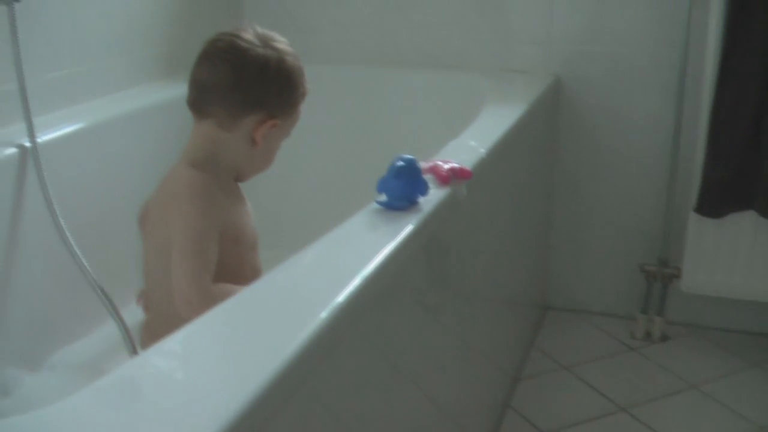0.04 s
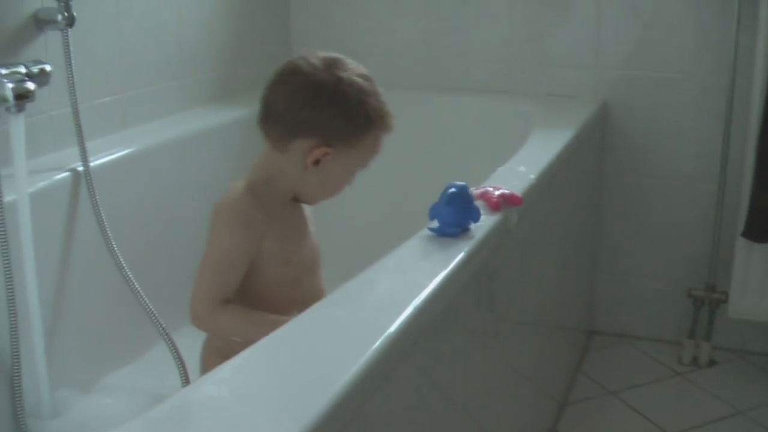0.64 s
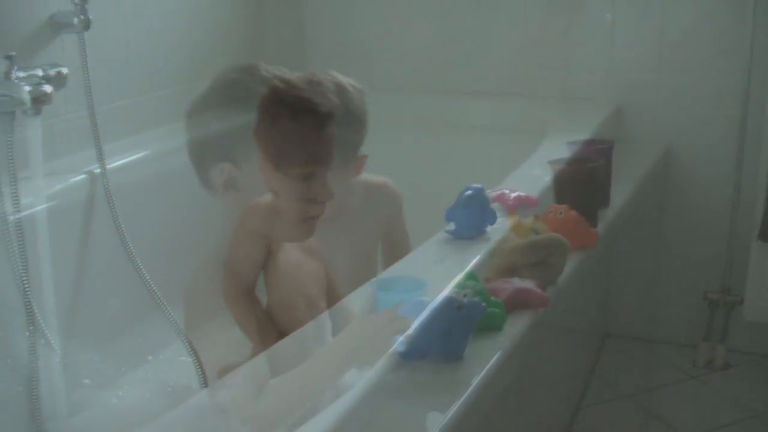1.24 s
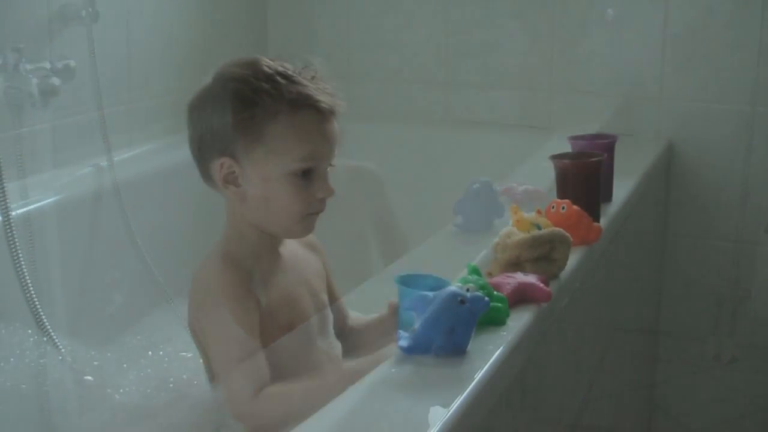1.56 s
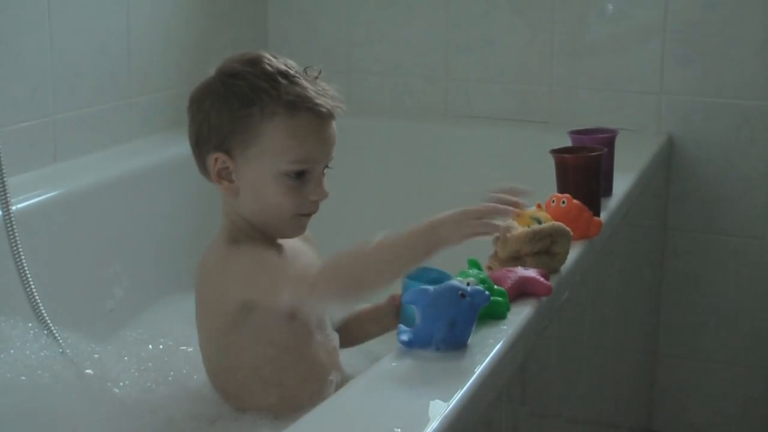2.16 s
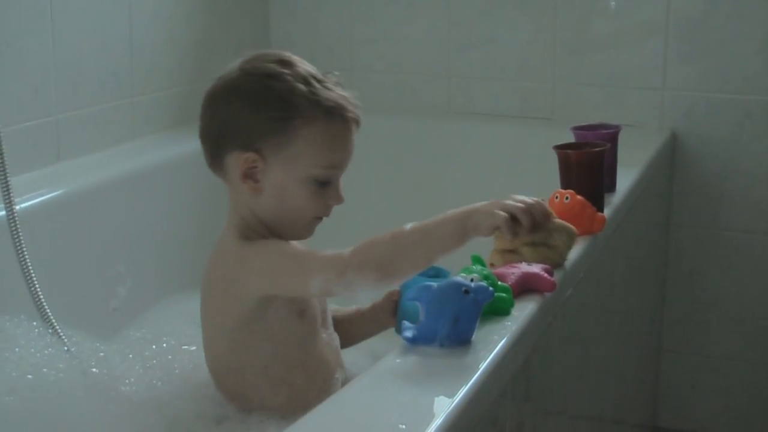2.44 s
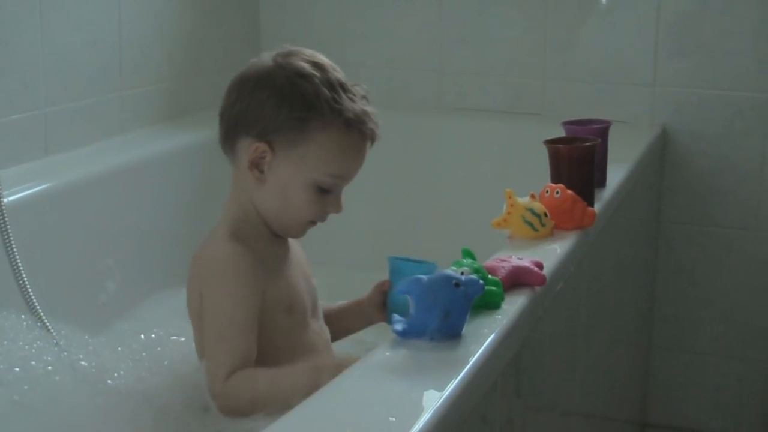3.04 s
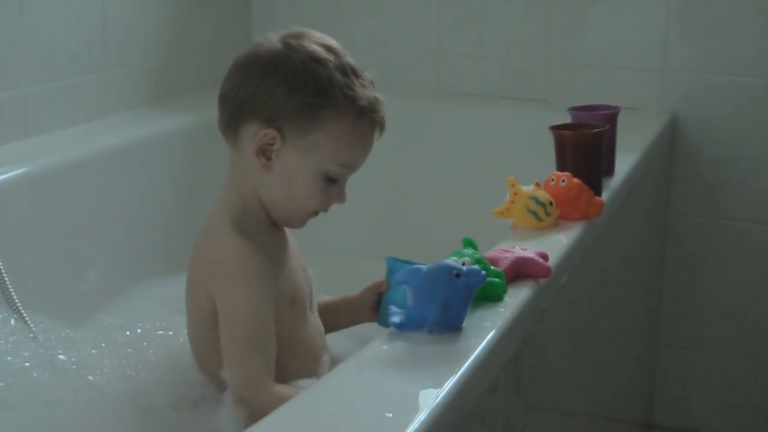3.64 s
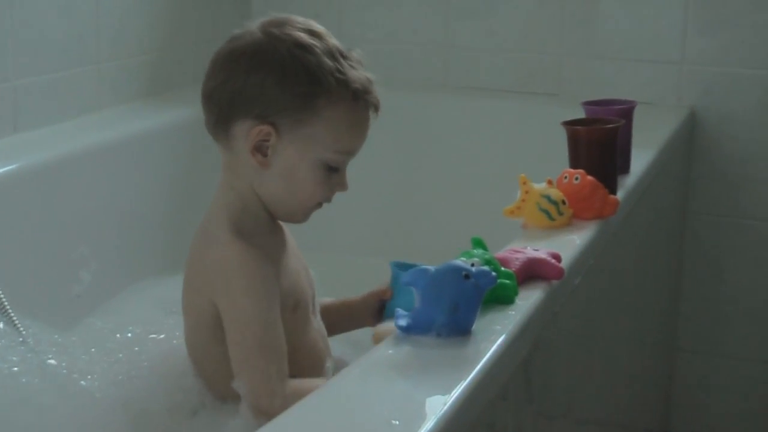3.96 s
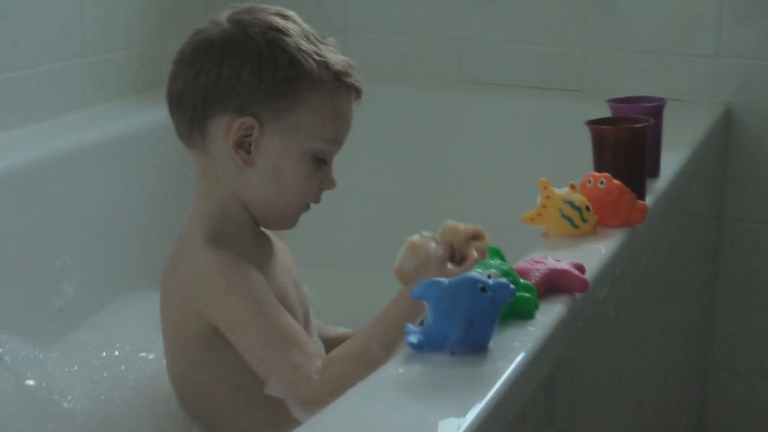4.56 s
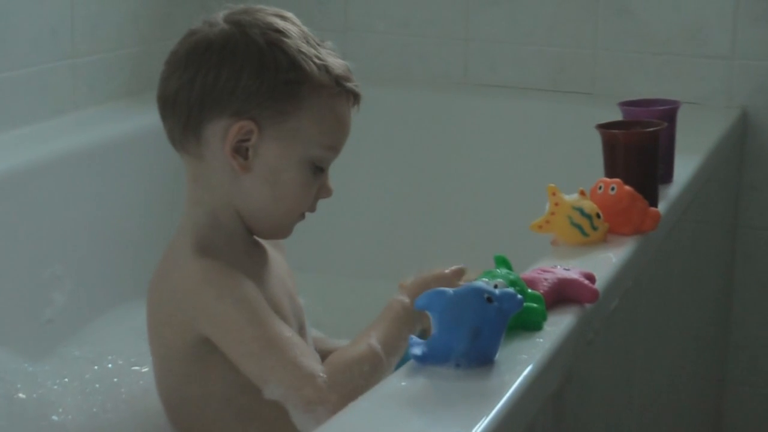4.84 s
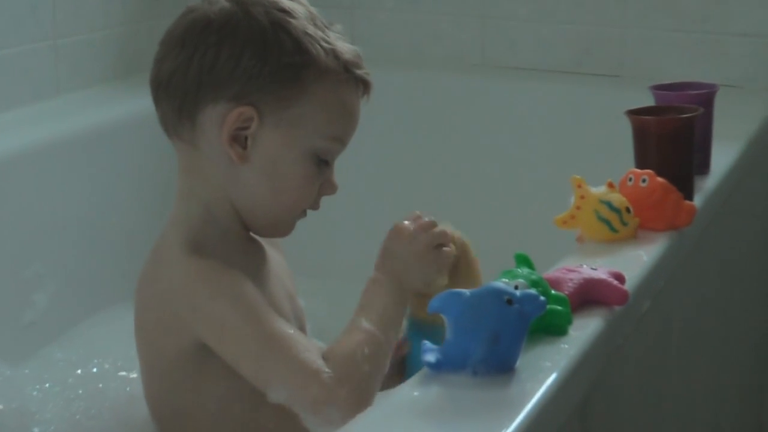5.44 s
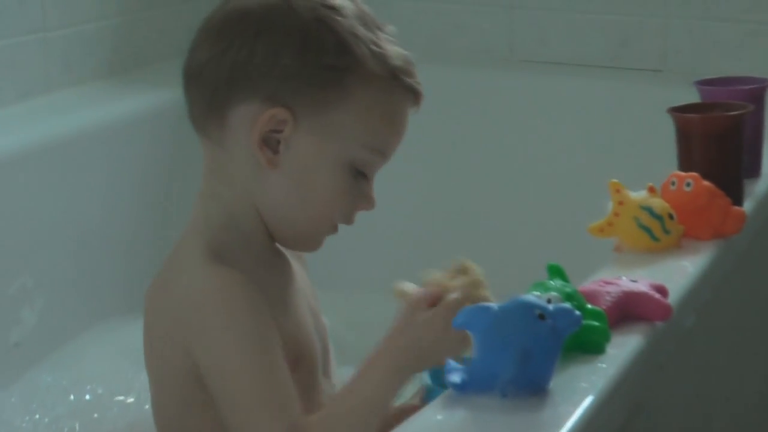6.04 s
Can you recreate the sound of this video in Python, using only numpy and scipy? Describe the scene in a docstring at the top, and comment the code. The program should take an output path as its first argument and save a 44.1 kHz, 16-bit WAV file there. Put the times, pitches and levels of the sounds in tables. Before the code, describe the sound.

Heard from beside the tub in a small, echoing bathroom, a jet of water churns into the bath, then shuts off. In the quiet, plastic toys click twice and the water swishes softly. Suds fizz faintly as a hand moves through the bath and squeezes out a sponge, giving a brief run of splashes and plopping drops that trails off into low room tone.

```python
"""Tiled bathroom, one microphone beside the tub. A tap gushes into the filled bath, its jet churning
up bubbles and spray, and dies away by 2 s. Two very short, dry clicks break the hush at 2.8 and 3.5 s,
and water begins to swish. From 3.6 s foam fizzes; then a hand stirs the bath and wrings a wet sponge
over a plastic cup: water sloshes, plops and spatters, and the tiles answer. The last drips fall
near 6 s, over quiet room tone."""
import sys
import numpy as np
from scipy import signal
from scipy.fft import rfft, irfft, next_fast_len
from scipy.io import wavfile
from scipy.ndimage import uniform_filter1d, map_coordinates

SR = 44100
rng = np.random.default_rng(int(sys.argv[2]) if len(sys.argv) > 2 else 0)


def int16_out(signal):
    """Quantize to a 16-bit WAV file."""
    q = np.round(np.clip(np.atleast_2d(signal).T, -1, 1) * 32767)
    wavfile.write(sys.argv[1], SR, q.astype(np.int16))


N = 277389
TIME = np.arange(N) / SR

# Under the jet, the large bubbles and the smaller ones: f/Hz, level/dB
GULP_SPECTRUM = [(30, -60), (70, -96), (120, -39.5), (180, -26), (250, -13.5), (330, -12), (400, -2),
                 (520, -1), (720, -3.5), (900, -15), (1400, -41), (4000, -73)]
GURGLE_SPECTRUM = [(150, -78), (550, -21), (850, -2.5), (1350, 5.5), (2000, 5), (3000, 3), (4000, -12.5),
                   (5500, -28), (12000, -53)]
# At the surface, where the jet breaks: f/Hz, level/dB
SPRAY_SPECTRUM = [(1470, -49), (2500, -19.5), (3650, -5.5), (4520, -13.5), (5680, -9.5), (7370, 0),
                  (8240, -1.5), (9880, 5.5), (12900, -7), (15900, -6), (16500, -11)]
# Standing waves of tub and room: f/Hz, width/Hz, lift/dB
TUB_MODES = [(178, 12, 6), (367, 11, 10), (430, 16, 9), (517, 13, 10), (613, 14, 7), (702, 16, 4),
             (761, 16, 5), (941, 20, 7), (1049, 20, 4), (1400, 18, 5), (1466, 16, 4), (1553, 16, 5),
             (1931, 18, 6), (2528, 26, 5), (3540, 32, 5)]
# The jet's hiss, and how hard it churns air under as the tap closes: t/s, level/dB
HISS_LEVELS = [(0.0, -51.5), (0.1, -54.5), (0.2, -54), (0.3, -43.5), (0.4, -48), (0.5, -47.8), (0.6, -54.5),
               (0.699, -52.5), (0.8, -50.5), (0.9, -46.5), (1.0, -48.5), (1.101, -49.5), (1.2, -53),
               (1.3, -53), (1.4, -55), (1.5, -65), (1.6, -56), (1.7, -53), (1.8, -59), (1.9, -71)]
CHURN_LEVELS = [(0, 0.5), (.35, -0.5), (.7, 1), (1.05, 0), (1.28, -0.5), (1.36, -2), (1.61, -3.5),
                (1.67, -7.5), (1.85, -14.5), (1.97, -23.5)]
def tap(end_s=1.971):
    """The jet drives bubbles under the surface and throws fine spray, which dies away first."""
    flow = lambda fade_s: np.sin(np.pi / 2 * np.clip((end_s - TIME) / fade_s, 0, 1))
    cloud = bubbles(rate=2200, hz=1199.6, spread=0.848, cycles=20.5, scatter_db=2.5, size=1300)
    drops = bubbles(rate=4000, hz=8650, spread=0.51, cycles=1.9, scatter_db=2, size=64)
    churn = room(cloud + amp(-2) * drops, direct_db=-4) + amp(4.5) * rng.standard_normal(N)
    gulps = amp(-45.5 + 0.96 * wobble(15.3)) * coloured(churn, GULP_SPECTRUM, TUB_MODES)
    gurgle_gain = amp(-43 + 0.44 * wobble(13.75))
    gurgle = gurgle_gain * coloured(patchy(churn, depth_db=0.5), GURGLE_SPECTRUM, TUB_MODES)
    spray = amp(-38 + 0.61 * wobble(15.1)) * coloured(churn, SPRAY_SPECTRUM)
    hiss = amp(np.interp(TIME, *np.transpose(HISS_LEVELS))) * band(N, lo_hz=3470, hi_hz=6440)
    bubbling = (gulps + gurgle) * amp(np.interp(TIME, *np.transpose(CHURN_LEVELS)))
    return (bubbling + hiss) * flow(fade_s=0.096) + spray * flow(fade_s=1.13)


# Under the tap, the biggest gulps of air: middle t/s, level/dB, f/Hz, length/s, log spread of pitch
AIR_GULPS = [(0.027, -41, 980, 0.067, .08), (0.03, -37.5, 620, 0.061, 0.082),
             (0.127, -42.5, 558, .03, 0.17), (0.185, -40.5, 1360, 0.08, 0.05), (.3, -44, 3450, .05, .08),
             (0.309, -43, 410, 0.041, .05), (0.46, -38.5, 520, 0.03, 0.016), (0.511, -38, 397, .035, .08),
             (.585, -41, 540, .03, 0.049), (.665, -43, 513, 0.028, 0.017), (0.68, -43, 700, 0.21, 0.086),
             (0.693, -38, 1970, 0.036, 0.096), (.785, -43, 425, .035, 0.035), (.84, -39.5, 430, .025, .03),
             (0.889, -36.5, 440, 0.031, 0.095), (0.974, -41, 2620, 0.034, 0.059),
             (.99, -39.5, 510, .035, 0.03), (1.09, -37.5, 497, 0.0399, 0.054),
             (1.298, -47.5, 1400, 0.19, 0.076), (1.42, -40.5, 508, 0.062, 0.015),
             (1.52, -43.5, 506, .03, 0.016), (1.595, -46, 516, 0.03, 0.015)]
def surges():
    """Air dragged down by the jet breaks into a burble of bubbles and wakes the tub's standing waves."""
    out, t = np.zeros(N), np.arange(SR // 10) / SR
    for s, db, hz, length, spread in AIR_GULPS:
        swarm = np.zeros(SR // 2)
        for place, detune in zip(rng.uniform(size=30), rng.standard_normal(size=30)):
            add(swarm, place * length, bubble(t, hz * np.exp(spread * detune), t60=22 / hz, rise=0.05))
        swarm = filtered(room(swarm, direct_db=2.5)[:SR], lambda f: amp(lift(TUB_MODES, f)))
        swarm *= np.sqrt(length * SR) / np.linalg.norm(swarm)
        add(out, max(s - length / 2, 0), amp(db - 3.5) * swarm)
    return above(out, hz=297)


# Drips below the sponge: t/s, level/dB, f/Hz, climb as a share of pitch, splash against ring/dB
DRIPS = [(4.2, -56.5, 2290, .05, -8), (4.249, -41.5, 1254, 0.14, -11), (4.262, -51, 1880, .1, -4),
         (4.279, -44.5, 3020, .04, -7), (4.289, -40.5, 1203, .06, -14), (4.347, -47.5, 1520, .12, -10),
         (4.363, -54, 1910, .05, -8), (4.39, -54, 1400, .2, -20), (4.445, -57, 1320, .1, -6),
         (4.485, -50, 2780, .05, -18), (4.542, -47, 660, .06, -10), (4.553, -45, 2760, .1, 1),
         (4.611, -44.5, 2280, 0.082, -3), (4.631, -49.5, 1276, 0.027, -18), (4.642, -48, 690, .06, -14),
         (4.702, -48.5, 2170, .03, -14), (4.705, -45, 2780, .04, -19), (4.712, -42, 653, 0.087, -12),
         (4.727, -43.5, 1080, .1, -10), (4.738, -50, 1760, .1, -10), (4.768, -42, 3890, 0.11, -3),
         (4.792, -46.5, 3170, .08, -14), (4.806, -48, 1990, .05, -14), (4.808, -37.5, 900, .05, -20),
         (4.836, -43.5, 1494, 0.11, -6), (4.836, -45, 5250, .05, -8), (4.854, -43.5, 1830, 0.099, -14),
         (4.872, -43, 1050, 0.11, -14), (4.884, -46, 3180, .05, -14), (4.912, -46.5, 2560, .04, -20),
         (4.925, -50, 2000, 0.043, -16), (4.927, -48, 766, 0.12, -14), (4.953, -45, 3330, .06, -5),
         (4.967, -45.5, 3440, .03, -14), (5.005, -52.5, 797, .05, -20), (5.058, -49.5, 3340, .1, -7),
         (5.075, -46, 1995, .06, -12), (5.086, -51, 1144, .2, -8), (5.11, -51.5, 492, .1, -16),
         (5.171, -54, 1180, .03, -20), (5.34, -52, 1410, .1, -4), (5.357, -54, 1430, .12, -15),
         (5.505, -63, 1780, .08, -16), (6.17, -58, 2770, .04, -18)]
def plops(cycles=58, longest_s=0.033, pinch_off_s=0.0016):
    """Each drip traps a bubble that rings until it fades or surfaces; its splash sheds two more."""
    out, t = np.zeros(N), np.arange(SR // 8) / SR
    for s, db, hz, climb, splash_db in DRIPS:
        t60 = min(cycles / hz, longest_s)
        ring = bubble(t, hz, t60, climb)
        splash = amp(-60 * t / 0.03) * band(len(t), lo_hz=hz * 0.85, hi_hz=hz * 1.18)
        for delay, detune in zip(rng.uniform(0.003, 0.02, size=2), rng.standard_normal(size=2)):
            add(splash, delay, 0.6 * bubble(t, hz * np.exp(0.08 * detune), t60, climb))
        plop = (ring + amp(splash_db) * splash) * (1 - np.exp(-t / pinch_off_s))
        heard = room(above(plop, hz * 0.7), direct_db=-2)
        add(out, s, amp(db + 6) * heard * np.linalg.norm(ring) / np.linalg.norm(heard))
    return out


# Drops slapping the surface: t/s, level/dB, bright f/Hz, middle/dB and top/dB against the bright band
DROP_SLAPS = [(3.14, -57.5, 9900, -2, -8), (3.262, -53, 9800, -3, -15), (4.282, -43.5, 9700, -2, -16),
              (4.484, -54.5, 9800, 2.5, -12), (4.553, -40.5, 9200, -6, -17),
              (4.602, -37.5, 10000, -10, -10), (4.689, -51.5, 9800, 8, -2), (4.767, -34, 9350, -6, -25),
              (4.953, -51, 11800, 2, -1), (5.059, -49, 10500, 1, -9), (5.272, -53.5, 10200, -4, -10),
              (5.341, -59, 10200, -14, -12), (5.478, -46, 10700, -11, -6), (5.486, -41, 10400, -18, -11),
              (5.611, -56, 9800, 2, -10), (5.887, -53, 10200, -25, -6), (6.162, -51.5, 9700, -12, -15)]
def spatter(attack_s=0.0031, decay_s=0.0075, echo_db=-9.5):
    """Each drop bursts into spray, brightest at its tiniest bubbles' pitch, and hangs on in the room."""
    out, size = np.zeros(N), SR // 2
    t = np.arange(size) / SR

    def fade(hz):
        echo = amp(echo_db - 60 * t / along(TILE_DECAY, hz))
        return (1 - np.exp(-t / attack_s)) * np.hypot(np.exp(-t / decay_s), echo)

    strays = [(s, -59.5, 9800, -2, -14) for s in rng.uniform(5, 5.7, size=7)]  # off the wrung sponge
    for s, db, hz, middle_db, top_db in DROP_SLAPS + strays:
        noise = rng.standard_normal(size)
        bright = unit(filtered(noise, lambda f: 1 / (1 + ((f - hz) / 1200) ** 2))) * fade(hz)
        middle = amp(middle_db) * band(size, lo_hz=2480, hi_hz=8650) * fade(hz=5500)
        top = amp(top_db) * band(size, lo_hz=11500, hi_hz=16700) * fade(hz=14000)
        add(out, s, amp(db - 5.5) * (bright + middle + top))
    return out


def cup(start_s=4.45, empty_hz=610, fill_s=2.2):
    """The gush from the sponge excites the air in a cup, whose note climbs as the air column shortens."""
    air_left = np.clip(1 - (TIME - start_s) / fill_s, 0.25, 1)
    gush = amp(-47) * swell(peak_s=4.745, rise_s=0.095, fall_s=0.081)
    ringing = bubbles(rate=400, hz=empty_hz / air_left, spread=0.16, cycles=28, scatter_db=2, size=1800)
    return above(gush * ringing, hz=560)


def slosh():
    """A hand stirs the bath and water runs off the sponge in uneven spurts of bubbles."""
    effort, hz = stirring()
    spurt_hz = hz * np.exp(0.2 * wobble(35))
    cloud = bubbles(rate=240, hz=spurt_hz, spread=0.35, cycles=32, scatter_db=2.5, size=1500)
    wash = band(N, lo_hz=1200, hi_hz=4700)
    return above(effort * (amp(-3.5) * cloud + amp(-14) * wash), hz=560)


# The hand in the bath: peak t/s, level/dB, rise/s, fall/s, typical bubble f/Hz
HAND_STROKES = [(4.17, -65.5, 0.19, 0.11, 3420), (4.37, -63.5, 0.065, 0.15, 1650),
                (4.74, -52, 0.15, 0.086, 2680), (4.846, -52, 0.039, 0.039, 1374),
                (5.085, -57.5, 0.022, 0.092, 1826), (5.53, -68, 0.053, 0.15, 2400)]
def stirring():
    """How hard the hand moves the water, and the bubble pitch of whichever strokes prevail."""
    gains = np.array([amp(db) * swell(s, rise, fall) for s, db, rise, fall, _ in HAND_STROKES]) + 1e-12
    pitches = [np.full(N, hz) for *_, hz in HAND_STROKES]
    return np.linalg.norm(gains, axis=0), np.average(pitches, axis=0, weights=gains ** 2)


# Two clicks, dry at the microphone: t/s, ring/dB, snap/dB, crackle/dB, tones as (f/Hz, level/dB)
DRY_CLICKS = [(2.7717, -29.5, -42, -36.5, [(400, -9.5), (650, -7.5), (1330, -0.5), (2200, -5), (3250, -7.5),
              (8900, -5)]), (3.4758, -32.5, -42.5, -38, [(260, -18), (750, -3.5), (3350, -7), (5000, -5),
              (5700, -8), (9500, -7)])]
# Their crackle: f/Hz, level/dB
CRACKLE_SPECTRUM = [(3000, -39), (6500, -8), (7600, 2), (9000, 2), (10700, 2), (12000, -5), (16500, -6)]
def clicks(attack_s=0.00021, decay_s=0.0019, hold_s=0.0013, end_s=0.005):
    """Damped tones with a snap and crackle over them, cut off within milliseconds, with no echo."""
    out, size = np.zeros(N), SR // 200
    t = np.arange(size) / SR
    choke = np.clip((end_s - t) / (end_s - hold_s), 0, 1)
    for s, db, snap_db, crackle_db, modes in DRY_CLICKS:
        ring = sum((-1) ** k * amp(db + level) * np.cos(2 * np.pi * hz * t)
                   for k, (hz, level) in enumerate(modes))
        burst = ring * np.exp(-t / decay_s) * (1 - np.exp(-t / attack_s))
        snap = amp(snap_db) * band(size, lo_hz=300, hi_hz=6440)
        crackle = amp(crackle_db) * coloured(rng.standard_normal(size), CRACKLE_SPECTRUM)
        add(out, s, (burst + snap + crackle) * choke)
    return signal.sosfilt(signal.butter(2, 150, "high", fs=SR, output="sos"), out)


# Water pushed along the tub: peak t/s, level/dB, rise/s, fall/s, centre f/Hz
WATER_SWELLS = [(3.265, -64, 0.11, 0.12, 1630), (3.28, -69.5, .05, 0.16, 4800),
                (3.335, -59, 0.063, 0.092, 534), (3.425, -65.5, 0.022, 0.045, 1400),
                (4.16, -67, .05, .05, 3280), (4.75, -52, 0.063, 0.12, 1050), (4.74, -62, .04, 0.054, 2000),
                (5.07, -57.5, .008, 0.026, 2880), (5.78, -67.5, 0.13, 0.083, 403)]
def swishes():
    """Water slides along the tub in soft swells, without trapping air."""
    return sum(amp(db) * swell(s, rise, fall) * band(N, lo_hz=hz / 1.6, hi_hz=hz * 1.38)
               for s, db, rise, fall, hz in WATER_SWELLS)


# Suds on the bath water: f/Hz, level/dB
FIZZ_SPECTRUM = [(1500, -26), (3000, -6), (5500, -7.5), (8000, -7), (10200, 0.5), (12500, -8.5),
                 (16500, -7)]
def foam(start_s=3.57, rise_s=0.27, end_s=5.96, fall_s=0.41):
    """Tiny bubbles burst once the suds are disturbed, louder with every stroke."""
    effort, _ = stirring()
    pops = bubbles(rate=1200, hz=8000, spread=0.41, cycles=3.7, scatter_db=-2.5, size=64)
    disturbed = np.clip(np.minimum((TIME - start_s) / rise_s, (end_s - TIME) / fall_s), 0, 1)
    gain = np.hypot(amp(-68.5) * disturbed, 0.28 * effort)
    return gain * coloured(pops + amp(2) * rng.standard_normal(N), FIZZ_SPECTRUM)


# At the tub wall: t/s, level/dB, f/Hz
WALL_BUMPS = [(1.055, -68, 180)]
def bump(length_s=0.1):
    """A soft knock makes the tub wall thud briefly."""
    out, t = np.zeros(N), np.arange(SR // 8) / SR
    for s, db, hz in WALL_BUMPS:
        thud = band(len(t), lo_hz=hz * 0.8, hi_hz=hz * 1.25)
        rumble = amp(-22) * band(len(t), lo_hz=60, hi_hz=110)
        add(out, s, amp(db) * (thud + rumble) * np.sin(np.pi * np.minimum(t / length_s, 1)))
    return out


# The tiled walls around the microphone: f/Hz, t60/s
TILE_DECAY = [(200, 0.71), (1000, 0.5), (4000, 0.66), (10000, 0.47), (16000, 0.25)]
def room(x, direct_db):
    """Direct sound plus the dense answer of the tiles, which the moving water keeps changing."""
    out, hop = np.zeros(N), SR // 6
    for first in range(0, len(x), hop):
        hz, t, noise = signal.stft(rng.standard_normal(SR // 2), SR, nperseg=256)
        decay = amp(-60 * t / along(TILE_DECAY, hz)[:, None])
        response = signal.istft(noise * decay, SR, nperseg=256)[1]
        response /= np.linalg.norm(response)
        response[0] += amp(direct_db)
        add(out, first / SR, signal.fftconvolve(x[first:first + hop], response / np.linalg.norm(response)))
    return out


# The still bathroom: f/Hz, level/dB
ROOM_TONE_SPECTRUM = [(40, -41), (100, -35), (200, -16), (300, -8), (390, 0), (520, -5), (640, -4.5),
                      (880, -20), (1250, -10.5), (1700, -16.5), (6300, -18.5), (8200, -25.5),
                      (10200, -17.5), (13000, -27.5), (16500, -29)]
def room_tone():
    """The steady hush of the small room."""
    return amp(-66.6) * coloured(rng.standard_normal(N), ROOM_TONE_SPECTRUM)


def bubble(t, hz, t60, rise):
    """A bubble rings and climbs in pitch as it nears the surface."""
    phase = 2 * np.pi * hz * (t + rise * t * t / (2 * t60))
    return np.sin(phase) * amp(-60 * t / t60) * (1 - np.exp(-2 * hz * t))


def bubbles(rate, hz, spread, cycles, scatter_db, size):
    """A cloud of rate bubbles a second, each size samples long: pitches scatter round hz, a few are loud."""
    count = int(rate * N / SR)
    start = rng.integers(0, N, count)
    pitch = np.broadcast_to(hz, N)[start] * np.exp(spread * rng.standard_normal(count))
    pitch = np.clip(pitch, 100, 15000)[:, None]
    strength = amp(scatter_db * np.minimum(rng.exponential(size=(count, 1)), 4))
    rings = strength * bubble(np.arange(size) / SR, pitch, cycles / pitch, rise=0.08)
    positions = start[:, None] + np.arange(size)
    return unit(np.bincount(positions.ravel(), rings.ravel(), N)[:N])


def patchy(x, depth_db):
    """Neighbouring bands swell and sink on their own, several times a second."""
    bands = signal.stft(x, nperseg=512)[2]
    drift = uniform_filter1d(rng.standard_normal(bands.shape), size=8, axis=0)
    drift = uniform_filter1d(drift, size=18, axis=1)
    return signal.istft(bands * amp(depth_db * unit(drift)), nperseg=512)[1][:N]


def swell(peak_s, rise_s, fall_s):
    """A gain that grows exponentially to 1 at peak_s and then dies away."""
    t = TIME - peak_s
    return np.exp(np.minimum(t / rise_s, -t / fall_s))


def wobble(rate):
    """A smooth random curve, rate knots a second."""
    return map_coordinates(rng.standard_normal(int(N * rate / SR) + 4), [TIME * rate])


def band(size, lo_hz, hi_hz):
    """A stretch of band noise at rms 1."""
    passband = lambda f: 1 / (1 + (f / hi_hz) ** 12) / (1 + (lo_hz / (f + 1)) ** 12)
    return unit(filtered(rng.standard_normal(size), passband))


def coloured(x, spectrum, peaks=()):
    """x under a broad spectrum with resonances on top, at rms 1."""
    return unit(filtered(x, lambda f: amp(along(spectrum, f) + lift(peaks, f))))


def above(x, hz):
    """A steep high-pass."""
    return filtered(x, lambda f: 1 / (1 + (hz / (f + 1)) ** 8))


def filtered(x, response):
    """x through a gain that depends on frequency."""
    size = next_fast_len(len(x) + 8192)
    return irfft(rfft(x, size) * response(np.fft.rfftfreq(size, 1 / SR)), size)[:len(x)]


def lift(peaks, f):
    """The dB that resonances add at each frequency."""
    return sum(db / (1 + (2 * (f - hz) / width) ** 2) for hz, width, db in peaks)


def along(points, hz):
    """Interpolate (f/Hz, value) points on a log axis."""
    f, values = np.transpose(points)
    return np.interp(np.log(hz + 1), np.log(f + 1), values)


def add(track, s, sound):
    """Mix a sound into the track at s seconds."""
    part = track[round(s * SR):][:len(sound)]
    part += sound[:len(part)]


def amp(db):
    """Decibels to gain."""
    return 10 ** (np.asarray(db) / 20)


def unit(x):
    """Scale to rms 1."""
    return x / np.sqrt(np.mean(x ** 2) + 1e-20)


def scene():
    """The bathroom in mono, from beside the tub."""
    running = tap() + surges() + bump()
    sponge = above(room(slosh() + cup(), direct_db=-1) + plops() + spatter(), hz=200)
    return (running + foam() + swishes() + sponge + clicks() + room_tone())[None]


def record(dry):
    """The camera's microphone track keeps nothing above 16750 Hz."""
    return filtered(dry[0], lambda hz: hz < 16750)[None]


dry = scene()
out = record(dry)
int16_out(out)
```